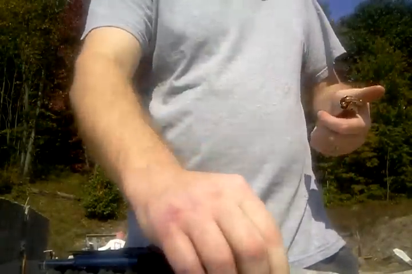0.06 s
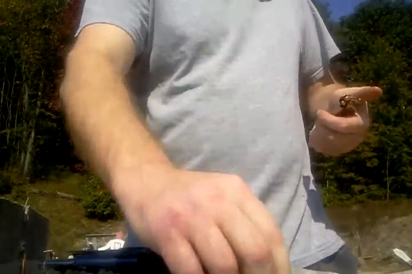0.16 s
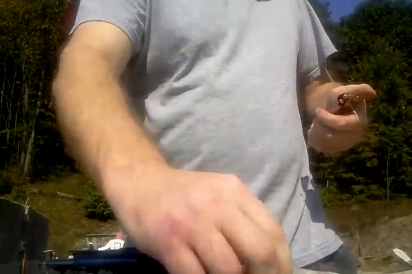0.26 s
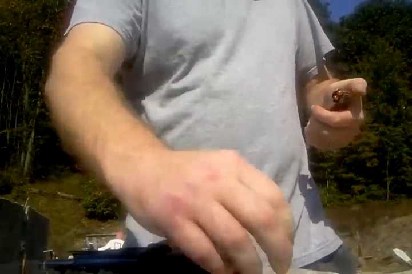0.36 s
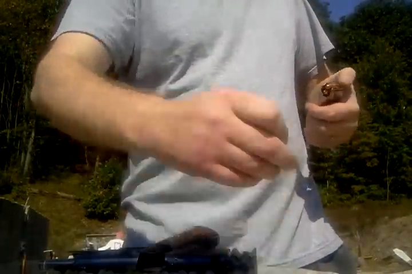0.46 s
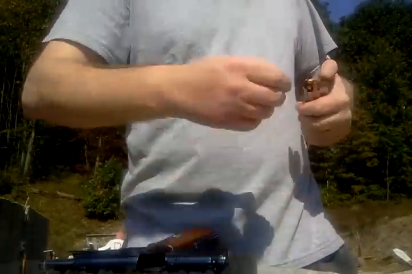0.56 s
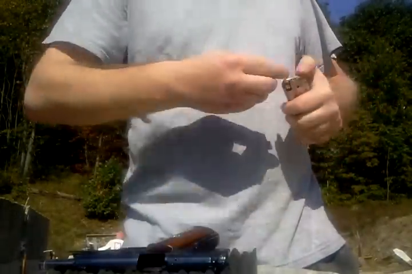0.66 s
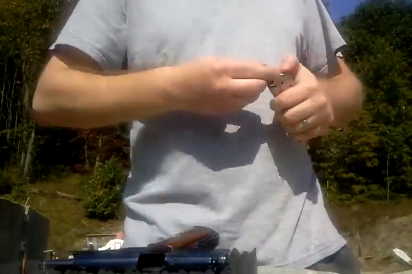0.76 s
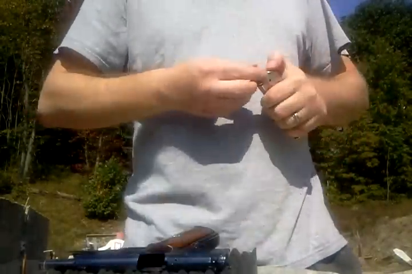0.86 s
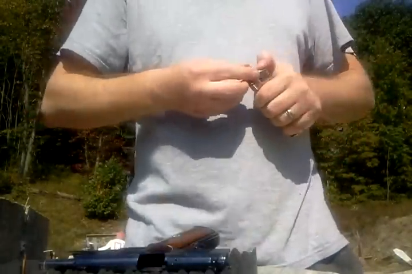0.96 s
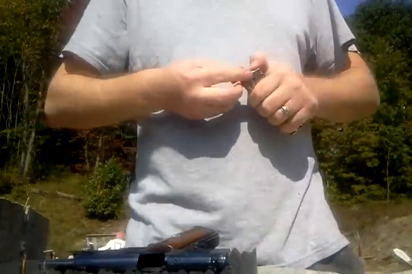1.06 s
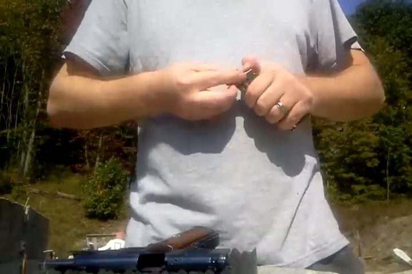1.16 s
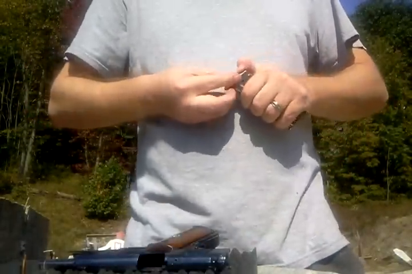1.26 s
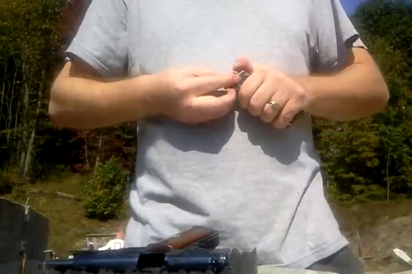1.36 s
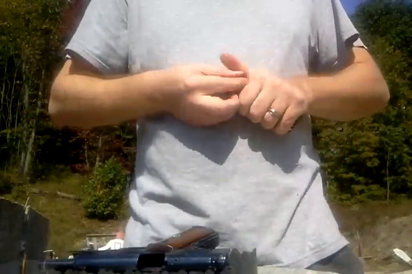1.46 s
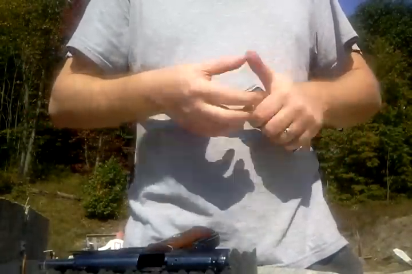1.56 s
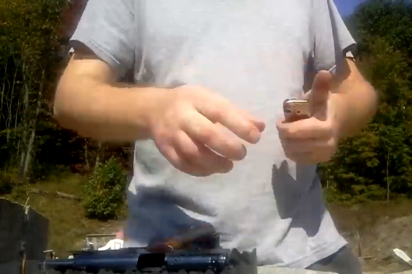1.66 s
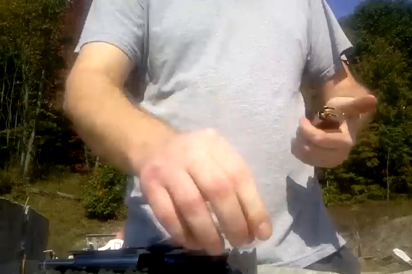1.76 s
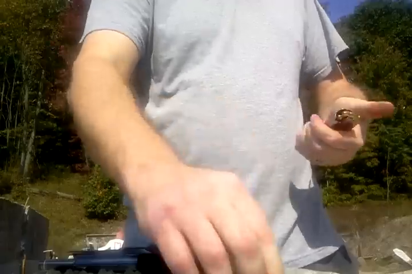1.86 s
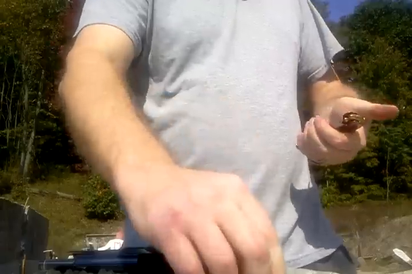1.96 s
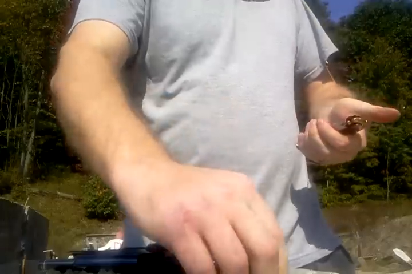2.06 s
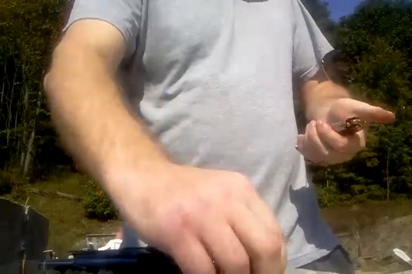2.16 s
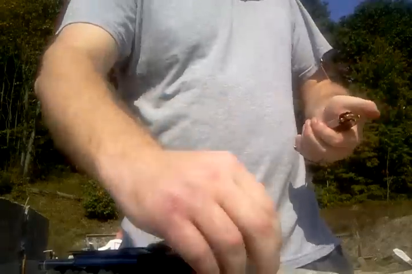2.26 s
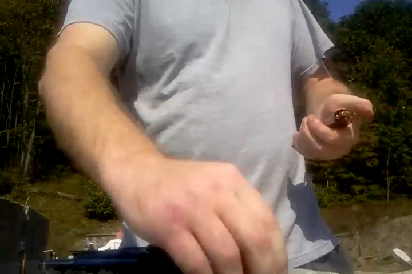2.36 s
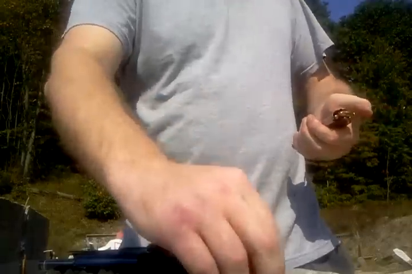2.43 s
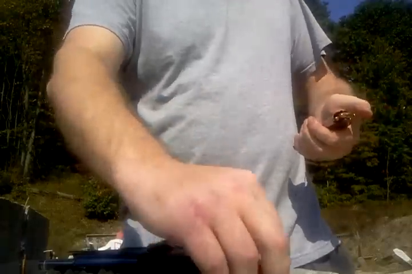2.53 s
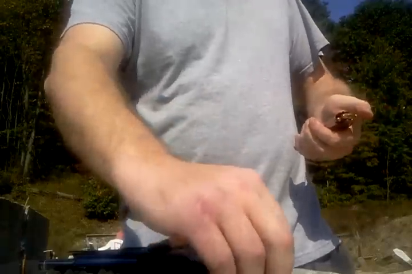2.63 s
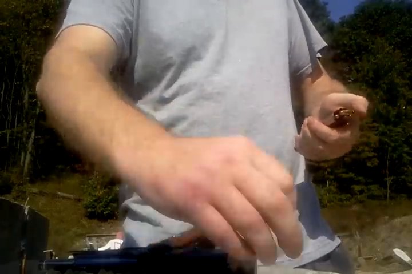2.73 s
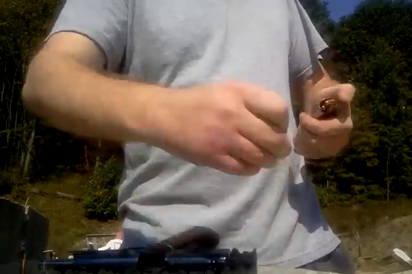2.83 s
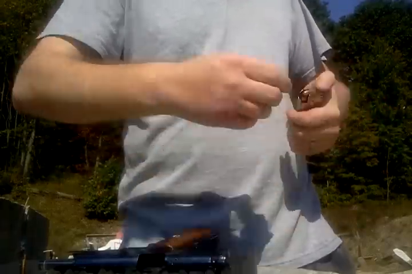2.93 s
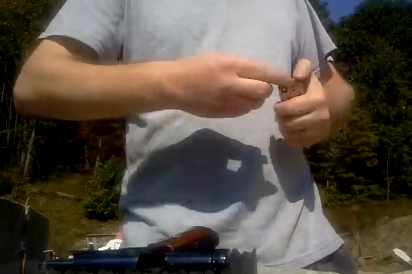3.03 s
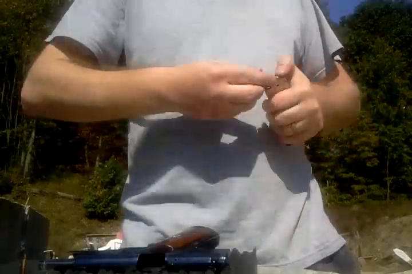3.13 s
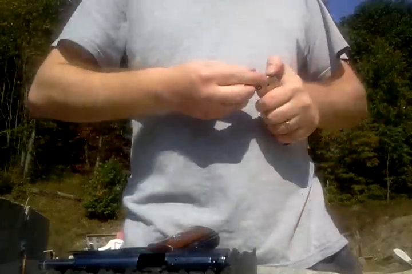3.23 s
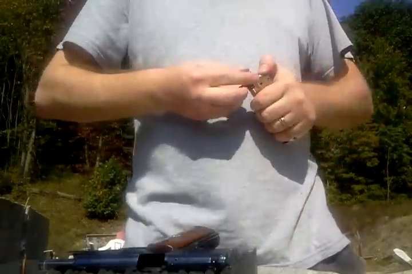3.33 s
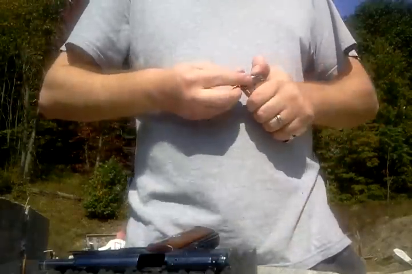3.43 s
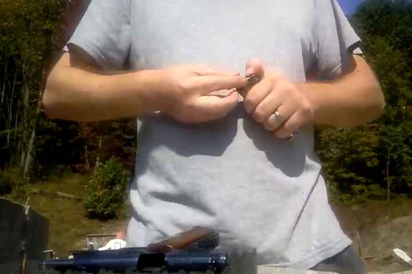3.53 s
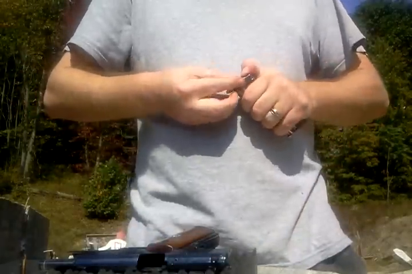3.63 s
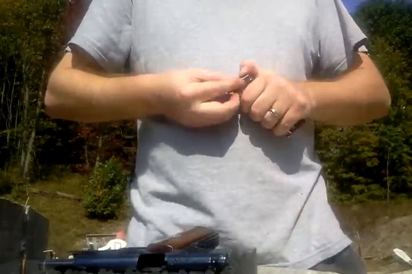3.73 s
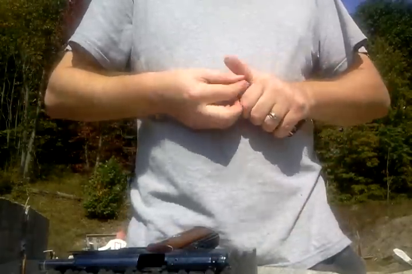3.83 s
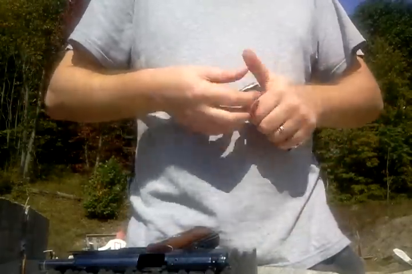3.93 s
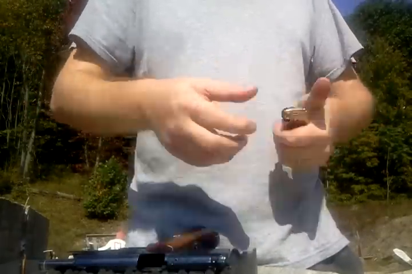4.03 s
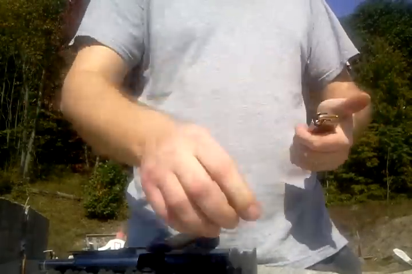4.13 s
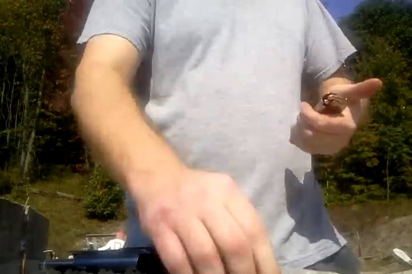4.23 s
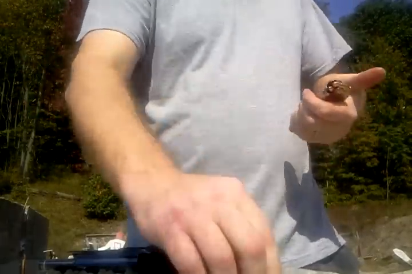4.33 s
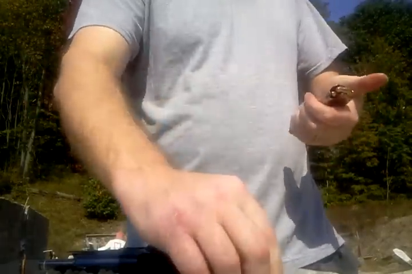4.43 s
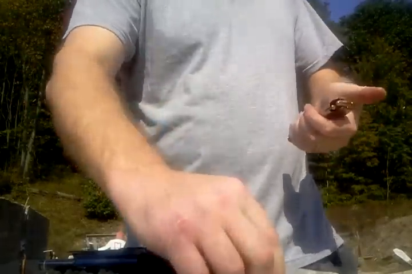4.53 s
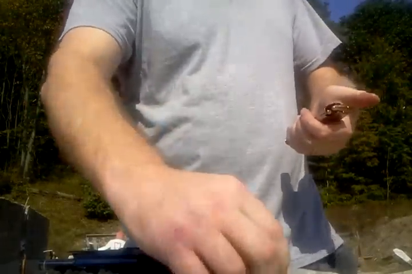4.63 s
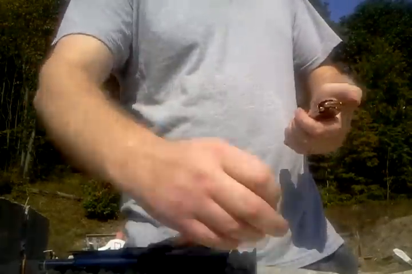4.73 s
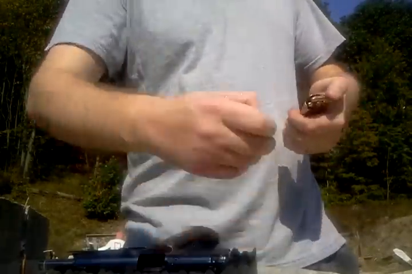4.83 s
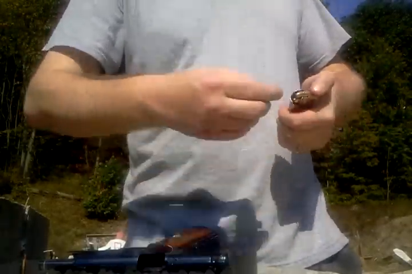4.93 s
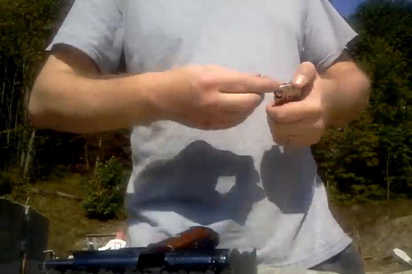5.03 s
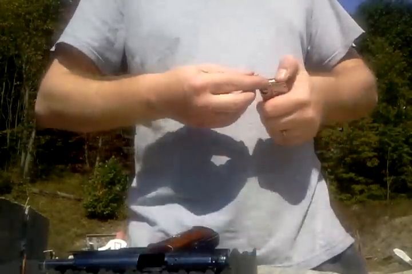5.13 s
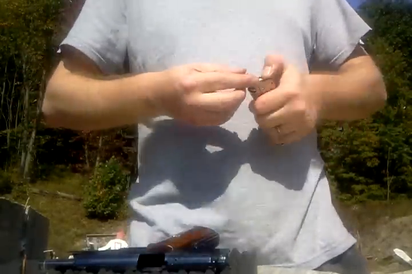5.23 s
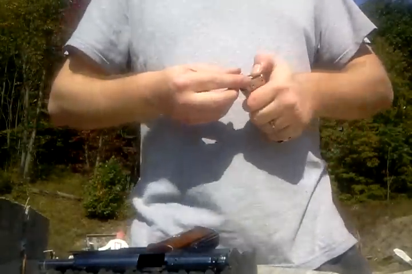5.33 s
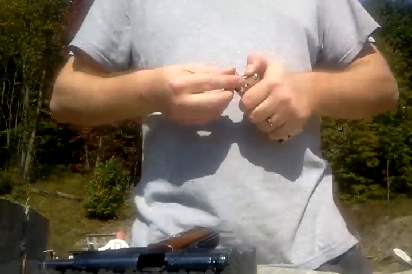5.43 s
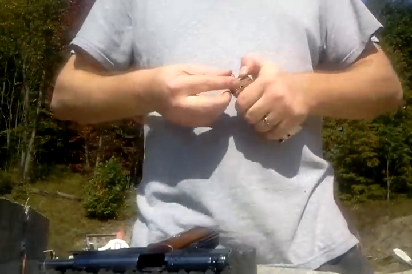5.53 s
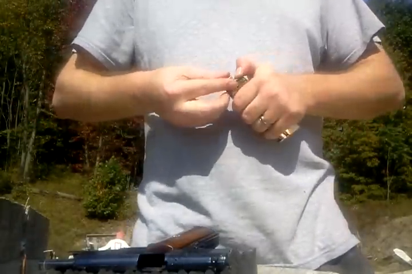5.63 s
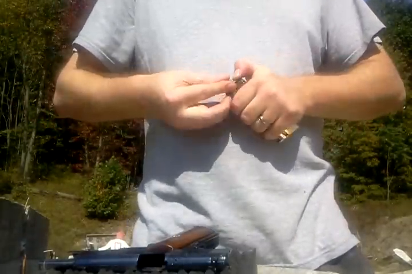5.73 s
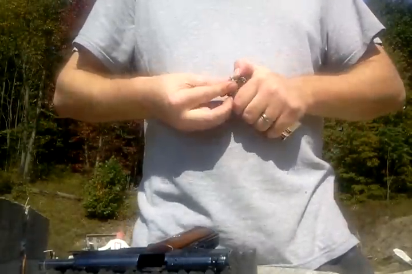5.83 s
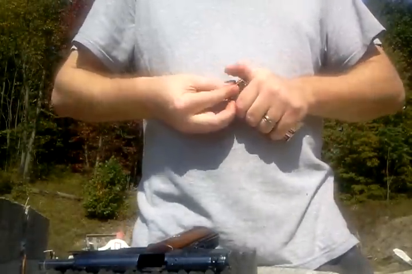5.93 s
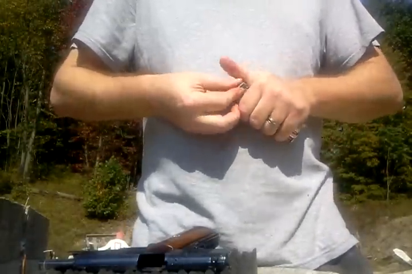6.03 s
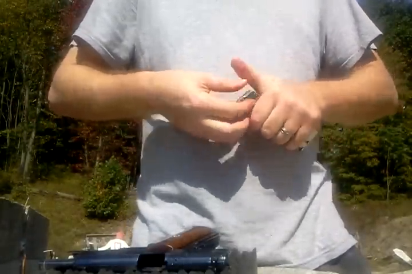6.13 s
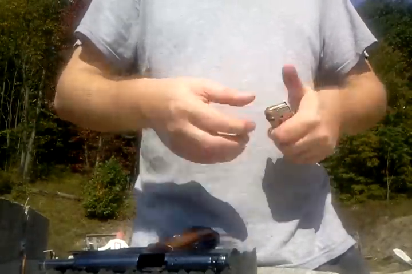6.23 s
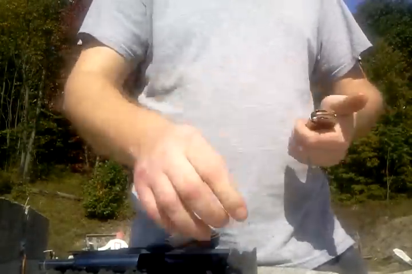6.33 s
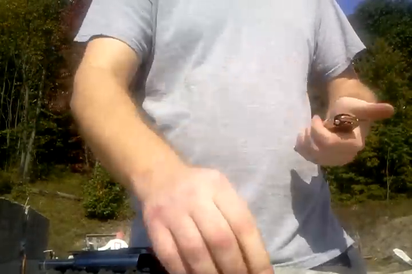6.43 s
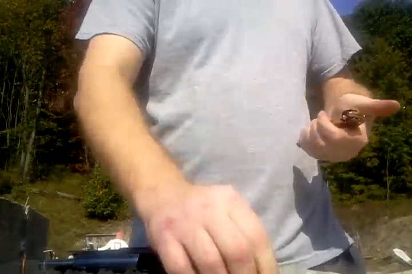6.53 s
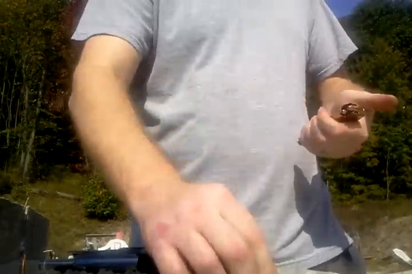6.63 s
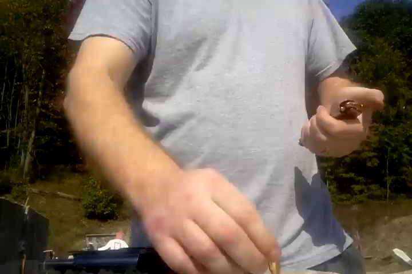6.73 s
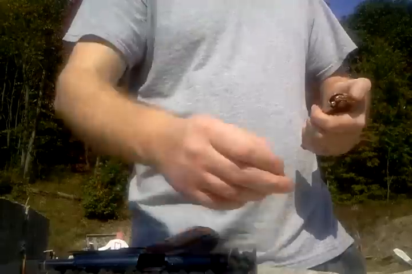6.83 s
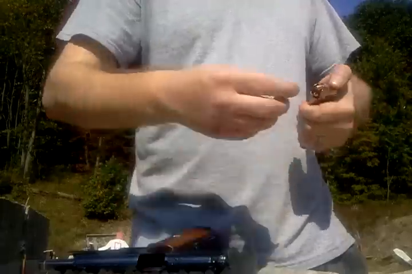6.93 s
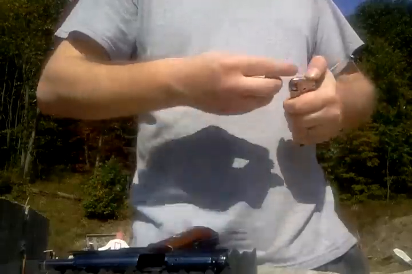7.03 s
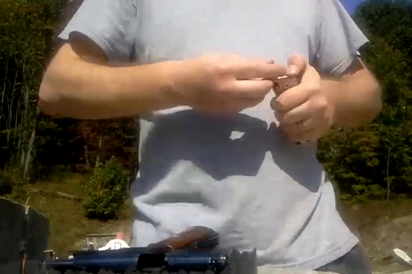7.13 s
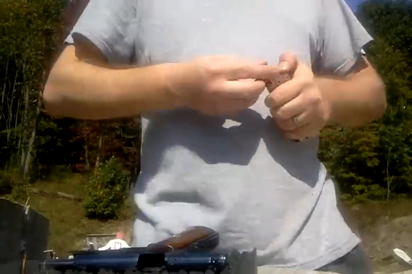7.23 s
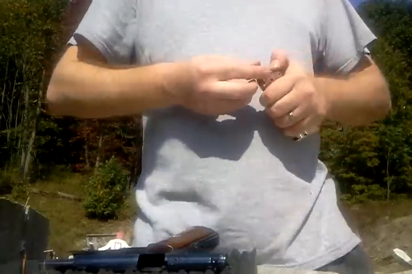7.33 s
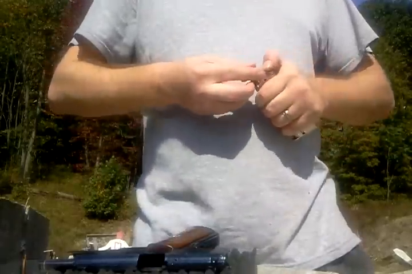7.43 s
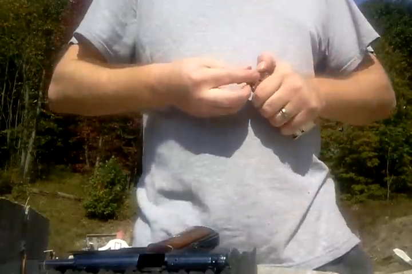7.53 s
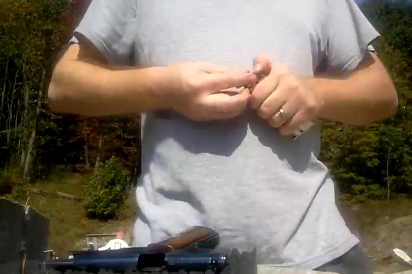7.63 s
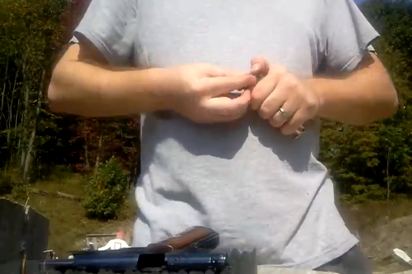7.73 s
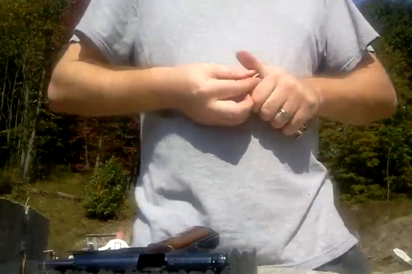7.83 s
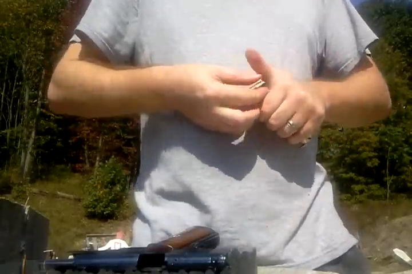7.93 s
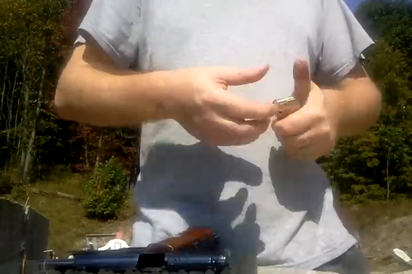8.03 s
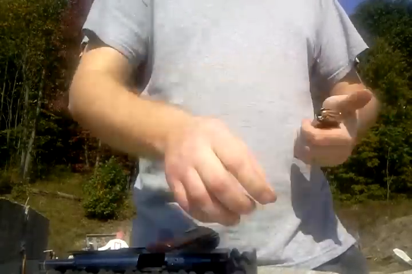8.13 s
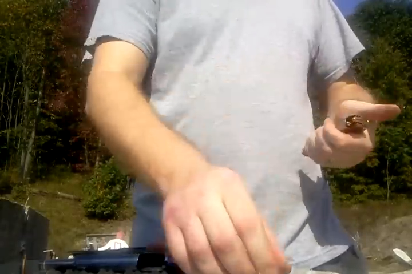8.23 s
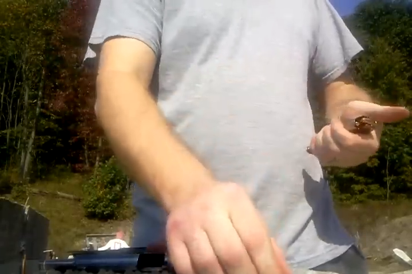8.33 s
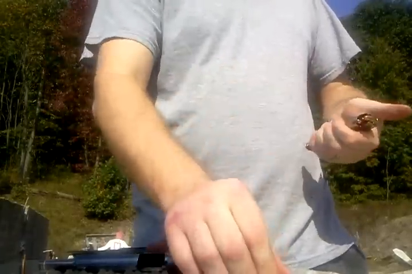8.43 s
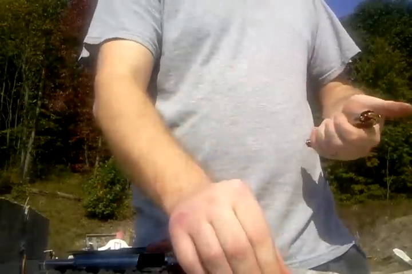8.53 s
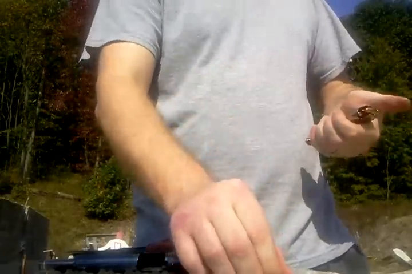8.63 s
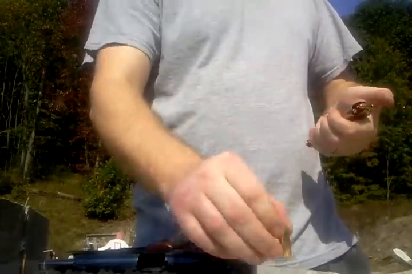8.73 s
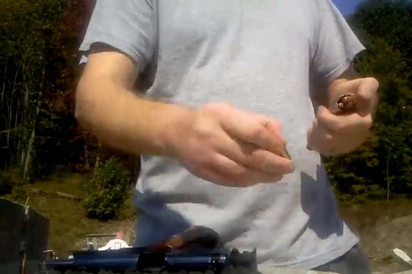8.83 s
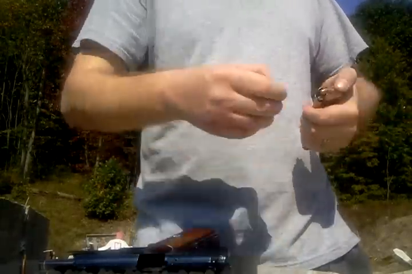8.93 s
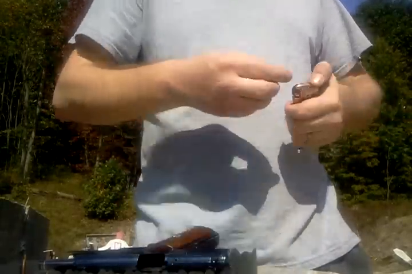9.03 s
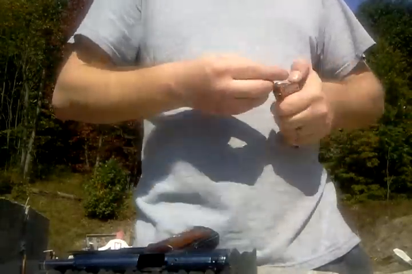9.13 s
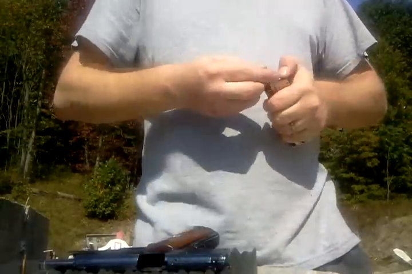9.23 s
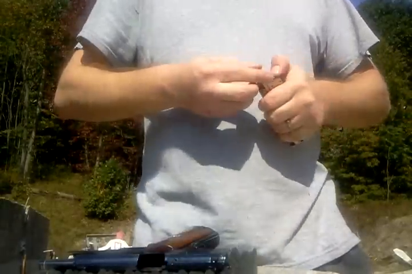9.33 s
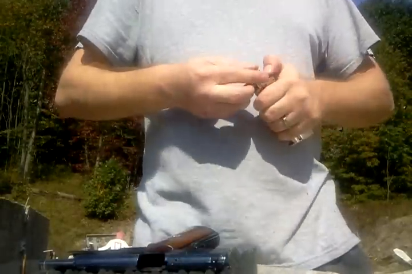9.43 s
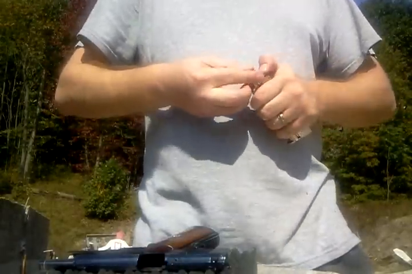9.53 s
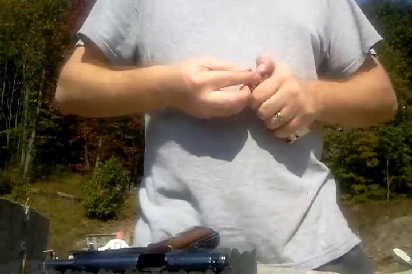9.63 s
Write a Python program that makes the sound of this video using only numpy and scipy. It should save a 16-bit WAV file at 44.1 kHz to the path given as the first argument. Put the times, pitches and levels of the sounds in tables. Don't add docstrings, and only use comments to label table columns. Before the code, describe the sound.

Close to a small microphone outdoors, brass cartridges slide and knock in a plastic tray, then click, scrape and snap sharply into a steel magazine, again and again. A soft breeze hiss and faint low motor hum lie behind. Near six seconds a distant gunshot booms and rolls back from the woods; a second, duller one follows two seconds later.

```python
import sys
import numpy as np
from scipy import signal
from scipy.io import wavfile
from scipy.ndimage import uniform_filter1d

SR = 44100
rng = np.random.default_rng(int(sys.argv[2]) if len(sys.argv) > 2 else 0)


def undo_db(level):
    steps = np.asarray(level, float) / 20
    return 10 ** steps


def to_wav(sig):
    pcm = np.clip(np.atleast_2d(sig), -1, 1) * 32767
    pcm = np.round(pcm).astype(np.int16)
    wavfile.write(sys.argv[1], SR, pcm.T)


N = 426888

# frequency [Hz], density [dB per Hz].
BREEZE_SPECTRUM = [(12, -43.5), (20, -42.5), (97, -13), (119, -7), (290, -8.5), (321, -7), (415, -13),
                   (565, -9.5), (694, -14.5), (1200, -22), (1560, -57.5), (2640, -120)]
# frequency [Hz], density [dB per Hz].
HISS_SPECTRUM = [(500, -16.5), (1100, 2.5), (2000, 1.5), (3000, 0), (5900, 0), (6900, -5), (7500, -13.5),
                 (8000, -27.5), (9000, -37), (11000, -75.5)]
# time [s], level [dB].
BREEZE_LEVEL = [(0, -61.5), (1.4, -61.5), (2.25, -60), (4.2, -61), (4.7, -60), (7.0, -58.5), (9.68, -55.5)]
# time [s], frequency [Hz], level [dB].
MOTOR_HUM = [(0, 135.3, -62.5), (1.0, 131.5, -58.5), (1.071, 130.4, -71), (1.2, 132.3, -57),
             (3.11, 124.4, -61.5), (4.339, 125, -55.5), (5.26, 128.2, -58.5), (7.0, 127.8, -55),
             (8.9, 128.4, -54.5), (9.68, 126.6, -52.5)]
# frequency [Hz], width [Hz], level [dB].
MOTOR_DRONE = [(323.5, 75, -72), (562, 30, -67)]

# start [s], peak [dB].
SHOTS = [
    (5.9484, -5),
    (7.9116, -6),
]
CRACK_SHARE = [
    1.6,
    1,
]
# delay [s], level after first shot [dB], level after second shot [dB].
BOUNCES = [(.0027, -8, -7), (.0075, -12, -11), (.0095, -12, -12), (.019, -9, -9), (.0245, -5, -6),
           (.06, -12, -16), (.0824, -5, -12)]
# delay [s], echo below the shot [dB].
TERRAIN_ECHO = [(0, -45), (.004, -22), (.075, -24), (.16, -20), (.28, -20.5), (.39, -27.5), (.5, -33.5),
                (.72, -45), (1.0, -53.5), (1.75, -58)]
# frequency [Hz], density [dB per Hz].
LOW_ECHO = [(71, -54.5), (120, -23), (242, -13.5), (395, -4), (436, -0.5), (582, 0), (694, 2.5), (1000, 5),
            (1310, 3.8), (1510, 0.5), (2400, -22), (3120, -27), (5280, -120)]
# frequency [Hz], density [dB per Hz].
HIGH_ECHO = [(880, -10.5), (1500, 1.5), (2040, -3), (3090, -2), (3510, -5), (4940, -5), (5410, -7),
             (6090, -5.5), (7290, -16), (8910, -41), (11600, -62.5), (19600, -120)]
# frequency [Hz], density [dB per Hz].
LATE_ECHO = [(120, -35.5), (200, -17.5), (499, -7.5), (566, -3), (740, 0), (1050, 1), (1900, -7.5),
             (3500, -23.5), (5280, -120)]

# start [s], level [dB], frequency [Hz], t60 [s].
THUDS = [(.23, -55, 70, .15), (0.317, -46, 101, 0.078), (.568, -45, 980, 0.026), (2.11, -45, 120, 0.051),
         (2.42, -41, 174, 0.15), (2.438, -43, 248, 0.12), (4.479, -46, 152.4, 0.099),
         (1.629, -36, 606, 0.0099), (2.919, -38, 265, 0.078), (4.013, -24, 550, 0.009),
         (6.93, -31, 507, 0.037), (8.907, -24.5, 530, 0.016)]
# frequency [Hz], level [dB], t60 [s].
TRAY_MODES = [(270, -12, .04), (500, -7, .018), (790, -3, .014), (1310, 0, .013), (1800, -3, .01),
              (2260, 0, .01), (2950, -2, .009), (3550, 0, .01), (4300, -4, .006), (4900, -2, .006),
              (5880, -2, .007), (6900, -6, .006)]
# start [s], peak [dB], strongest ring [Hz], low modes [dB].
KNOCKS = [(.138, -43, 394, -10), (.568, -44.5, 560, 3), (2.139, -38, 2960, -10), (2.224, -37, 1100, -3),
          (2.3985, -39, 1480, 2), (2.417, -47, 3900, -12), (2.434, -43, 3500, 0), (2.585, -46.5, 2500, -6),
          (2.685, -37.5, 894, -13), (2.944, -44, 900, 3), (2.813, -42.5, 1900, 0), (2.9068, -40.5, 950, 9),
          (2.9225, -34, 1250, -8), (2.928, -31.5, 870, -3), (4.468, -28, 3540, 1), (4.478, -29.5, 2940, -6),
          (4.545, -35, 3060, -16.5), (4.59, -45, 450, 0), (4.796, -41.5, 960, -1), (4.88, -44, 805, -2),
          (6.929, -31, 800, 2), (7.281, -41, 587, -14), (8.512, -27.5, 1360, -9), (8.708, -39, 2980, -19),
          (8.906, -37.5, 527, -10)]
# frequency [Hz], width [Hz], level [dB].
POCKET_MODES = [(1800, 278, 13.5), (2500, 990, 10), (3050, 390, 13), (3700, 290, 17.5), (4500, 1300, 1),
                (5900, 460, 17), (6890, 780, -13)]
# start [s], length [s], level [dB], treble [dB].
SLIDES = [(.01, 0.07, -63, -4), (0.176, 0.053, -57, 1), (0.23, 0.11, -60.5, -1), (0.338, 0.077, -59.5, -1),
          (0.44, 0.069, -57, 6), (.497, 0.059, -55, 11.5), (2.094, 0.075, -54.5, -4),
          (2.166, 0.054, -55.5, 3), (2.201, 0.1, -58, -8), (2.294, 0.046, -55, 6), (2.354, 0.059, -59.5, 3),
          (2.708, 0.048, -58.5, -1), (2.77, 0.051, -57.5, -1), (2.822, 0.069, -56.5, 2),
          (4.456, 0.077, -54, -4), (4.528, 0.025, -59, 6), (4.544, 0.089, -55.5, 3),
          (4.675, 0.042, -60.5, -3), (4.746, .052, -57.5, 0), (4.812, .07, -54.5, 6),
          (6.693, 0.055, -55, -2), (6.789, .017, -55.5, 4), (6.806, 0.076, -48.5, -4.5),
          (6.881, 0.038, -51, -10), (6.916, .022, -53, -3), (8.498, 0.093, -51, -5),
          (8.638, 0.053, -51, -12), (8.715, 0.036, -51.5, 5), (8.85, 0.056, -54, -6)]
# start [s], length [s], level
# [dB], treble [dB].
MORE_SLIDES = [(0.98, 0.063, -61.5, 0), (1.375, 0.033, -62, 0), (1.494, 0.021, -61, -9), (1.46, 0.056, -51, -3),
               (1.562, 0.065, -65, 11), (1.656, 0.057, -52.5, -2), (3.368, 0.05, -61, -13),
               (3.805, 0.085, -57.5, 0), (3.976, 0.025, -46, 4), (4.028, 0.067, -60, 3.5),
               (7.735, 0.061, -64, 2)]
# start [s], length [s], level [dB], frequency [Hz].
SQUEAKS = [(.185, .03, -63, 3300), (0.238, 0.027, -61, 3050), (0.278, 0.049, -59, 3050),
           (0.343, .018, -56, 3600), (.345, .012, -58, 5800), (.305, .014, -57, 2600),
           (.204, .009, -54, 3300), (0.387, 0.049, -63, 3220), (2.245, .025, -59, 3750),
           (2.272, 0.076, -60, 3050), (2.173, 0.028, -62, 2870), (6.795, 0.0086, -56, 3650),
           (6.838, 0.041, -52, 3600), (6.84, 0.018, -51, 1850), (6.885, 0.022, -56, 3650),
           (6.888, .022, -51, 1800), (6.917, 0.015, -56, 3600), (7.74, .012, -55, 6100),
           (7.771, .01, -57, 2300), (7.848, .025, -59, 6000), (7.818, 0.022, -57, 2100),
           (7.872, 0.032, -61, 2000), (4.485, .035, -59, 3000), (4.49, .04, -61, 3900),
           (4.565, .035, -60, 3100), (4.683, .03, -63, 3050), (4.755, .03, -61, 3700),
           (4.83, .05, -58, 3700), (4.825, .025, -62, 1400), (8.66, .03, -54, 3650)]

# frequency [Hz], level [dB], t60 [s].
MAGAZINE_MODES = [(1370, -7, .014), (1750, -4, .012), (2480, -1, .013), (3200, 0, .013), (4190, -2, .01),
                  (4670, -1, .008), (5100, 0, .008), (5820, 2, .008), (6380, 2, .008), (6900, 0, .007),
                  (7400, -3, .006)]
# start [s], peak [dB], strongest ring [Hz].
TICKS = [(1.0585, -42, 6450), (1.1902, -41.5, 5200), (1.2697, -44, 2940), (1.3734, -41, 2570),
         (3.4497, -48, 2870), (3.467, -41, 4700), (3.8406, -44, 3200), (3.903, -43.5, 3960),
         (3.9546, -43.5, 2570), (3.9668, -50, 5710), (5.258, -46, 1710), (5.4435, -49, 4100),
         (6.222, -23, 6160), (7.2165, -49, 6160), (7.327, -46, 6160), (7.3724, -43.5, 2676),
         (7.702, -46, 6140), (7.856, -49, 1910), (9.3955, -39.5, 6400), (9.5562, -42.5, 4500)]
# start [s], peak [dB], strongest ring [Hz], low modes [dB].
CLICKS = [(0.9858, -34, 2870, -14), (1.012, -33.5, 5600, -14), (1.0738, -37.5, 6200, -14),
          (1.1133, -40, 5050, -12), (1.286, -39.5, 3050, -2.5), (1.397, -35, 5560, -5),
          (1.4078, -37, 5760, -15), (1.595, -49, 6200, -12), (1.468, -35, 5700, -1),
          (1.478, -31, 5200, -16), (1.5727, -39, 2070, -8), (1.6107, -27, 5800, -19),
          (1.655, -35, 5810, -9), (1.678, -32, 2530, -4), (3.42, -34.5, 5100, -15), (3.7527, -30, 5180, -5),
          (3.811, -36, 4930, -9), (3.8173, -29.5, 1553, -7.5), (3.983, -27, 4300, -7),
          (3.9916, -31.5, 6300, -21), (4.021, -26.5, 4200, -7), (4.075, -38, 2500, -18),
          (4.082, -29.5, 6080, -9), (4.1, -35, 6000, -6), (5.548, -31, 5540, -15),
          (5.5826, -34.5, 5670, -8), (5.9258, -33, 6200, -13), (5.9413, -31, 5900, -10),
          (7.7358, -36, 5100, -9), (7.767, -46, 6120, -9)]
# start [s], peak [dB], strongest ring [Hz], low modes [dB], chatter length [ms].
SNAPS = [(1.392, -30, 3020, -12, 1.5), (1.4895, -40, 2400, 0, .5), (1.6415, -44, 4300, -7, 1),
         (1.686, -35.5, 6200, -18, .8), (1.626, -24, 5100, -20, 1.2), (1.6645, -33, 2900, 0, 1.2),
         (1.6904, -29.5, 2220, -12, 1.57), (3.279, -43, 4100, -17, 2), (3.3682, -29, 4530, -15, 2.6),
         (3.7307, -26.5, 5900, -8.5, 1.6), (3.802, -38, 4980, -5, 2), (3.985, -27, 5520, -24, 2.2),
         (4.008, -26, 4080, -8, 1), (1.517, -46, 1900, 0, 1), (4.0195, -23.5, 2500, -3, 1),
         (4.026, -35, 5000, -9, 1.2), (3.866, -43, 2200, 0, 2), (5.503, -45, 4060, -18, 2),
         (4.042, -43, 3200, 0, 1), (5.8882, -26, 4700, -12, .4), (5.8978, -24.5, 4600, -9, .9),
         (6.317, -18, 6870, -18, 2.1), (3.76, -41, 3200, -4, 2), (7.5795, -46, 6400, -20, 0.89)]
# (frequency [Hz], level
# [dB], t60 [ms]).
STACK_SEATS = [
    ([(1.4972, -21), (1.5003, -26)], [(2370, -2.5, 13), (3190, -3, 13), (4240, -10, 8), (5130, -4, 11), (5750, 1, 9.1), (6870, -12, 9.7)]),
    ([(1.6186, -23.5), (1.6207, -31)], [(1920, -4, 12), (3190, -3, 13), (4930, -0.5, 10), (5780, -2, 11), (7070, -9, 8)]),
    ([(1.6299, -9.5), (1.6313, -20), (1.6326, -23)], [(1370, -14.5, 12.5), (1965, -15, 13), (3101, -3.5, 12), (4300, -8, 10), (5070, 0.5, 10), (5790, -1, 11), (6930, 1, 8.7)]),
    ([(3.2642, -22), (3.2674, -24), (3.2697, -22.5), (3.2722, -29)], [(1980, -15, 12), (2570, -10, 11), (3800, -14.5, 10), (4260, -1.5, 16), (5380, -1.5, 11), (5700, -2, 11), (6400, -8, 9)]),
    ([(3.7918, -7.5)], [(1710, -11, 15), (2430, -10.5, 14), (3220, -4.5, 14.6), (4000, -8, 11), (4980, 1, 11), (5900, 1, 12), (6950, -9.5, 13)]),
               ([(4.0021, -20), (4.0031, -16), (4.0058, -19)], [(1390, -5, 11), (2530, -7.5, 14), (3200, -4, 12), (4120, -2, 13), (4600, -6, 12), (5970, -2, 9), (6840, 2, 8)]),
    ([(4.0128, -17), (4.0144, -8), (4.0153, -6.5)], [(1480, -12, 9), (2400, -9, 12), (3250, -8, 19), (4300, -3.5, 9.8), (4630, -2.5, 10), (5140, -6, 12), (5770, 1, 10), (6330, 2, 10), (7040, -8, 10)]),
    ([(5.4912, -16.5), (5.4935, -26)], [(2520, -14, 16), (3160, -18, 15), (4110, 2, 24), (4360, -1, 16), (5600, 0, 11), (5860, -5, 14), (6430, -1, 13), (6840, -5, 13)]),
    ([(7.586, -19.5)], [(1400, -21, 12), (2610, -20, 13), (3760, -13, 9), (5200, -3, 8.6), (6400, 1.5, 9.3), (6840, -8, 11)]),
]
# (frequency [Hz], level [dB], t60 [ms]).
CASE_DROPS = [
    ([(2.9183, -32), (2.9192, -17)], [(790, -5, 14), (1310, 2, 13), (1700, -1, 10), (2260, -3, 10), (2900, -8, 9), (3520, -2, 10), (4900, -10, 8), (5880, -8, 7)]),
]
# (frequency [Hz], level [dB], t60 [ms]).
NUDGES = [
    ([(7.7672, -37), (7.7722, -43), (7.7765, -41), (7.7805, -44), (7.7855, -43)], [(1500, -5, 10), (4600, -8, 8), (5900, -1, 12), (6300, -1, 10)]),
    ([(2.4095, -41), (2.4145, -38), (2.417, -43)], [(480, -6, 20), (1000, -3, 9), (1450, -1, 10), (1950, -5, 8)]),
]
# start [s], peak [dB].
TAPS = [
    (1.4354, -28),
    (5.2533, -25),
    (5.801, -30),
    (7.2624, -24.5),
]
# frequency [Hz], width [Hz], level [dB].
TAP_RINGS = [
    [(1390, 240, -19), (1970, 270, -17), (3060, 510, -16), (4350, 250, -14), (5620, 270, 0)],
    [(1710, 240, -4), (2490, 270, -7), (3980, 390, -9), (4670, 190, -10), (6380, 430, 0)],
    [(1480, 290, 0), (3250, 280, 0), (5230, 270, -3), (5700, 180, -2), (6510, 260, 0)],
    [(3980, 330, -8), (5010, 180, 0), (5420, 220, 0), (6230, 270, -1), (7110, 280, -18)],
]

HISS_DB, HISS_FOLLOWS = -60.5, 0.5
BANK_CRACK, FLIP_S = 2.5, .07
GROUND_DULL_DB, TREE_LINE_S, TREE_BRIGHT_DB = -5, .11, 2
AIR_LOSS_DB_PER_S, MOST_LOSS_DB = 20, -7.5
PATCH_DB = 1.2
POCKET_DRIFT = .035
SQUEAK_WIDTH_HZ, GRIT_DB = 330, -12
CLICK_MS, TICK_MS, KNOCK_MS = .9, 1.1, 1.0
TICK_LOW_DB = -11
FIRST_CONTACT = 1.1
SHELL_HZ, SHELL_RISE_MS, LIP_RISE_MS = 3600, 0.73, 0.15
RATTLE, RATTLE_MS = .1, 1.5


def evened(x):
    return x / np.sqrt(np.mean(x ** 2) + 1e-20)


def smooth_noise(width):
    return evened(uniform_filter1d(uniform_filter1d(rng.standard_normal(N), width), width))


def add(mix, s, sound):
    part = mix[max(round(s * SR), 0):][:len(sound)]
    part += sound[:len(part)]


def band(x, lo_hz, hi_hz):
    return signal.sosfilt(signal.butter(3, [lo_hz, hi_hz], "band", fs=SR, output="sos"), x)


def coloured(x, spectrum):
    f, db = np.transpose(spectrum)
    hz = abs(np.fft.fftfreq(4096, 1 / SR))
    log_gain = np.log(undo_db(np.interp(np.log(hz + 1), np.log(f + 1), db)))
    taps = np.fft.ifft(np.exp(np.conj(signal.hilbert(log_gain)))).real
    return evened(signal.oaconvolve(x, taps)[:len(x)])


def resonate(x, hz, width_hz):
    turn = np.exp(2j * np.pi * np.cumsum(hz * np.ones(len(x))) / SR)
    r = np.exp(-np.pi * width_hz / SR)
    return 2 * (turn * signal.lfilter([1 - r], [1, -r], x / turn)).real


def echo_db():
    t = np.arange(N) / SR
    s, shot_db = np.transpose(SHOTS)
    latest = np.maximum(np.searchsorted(s, t) - 1, 0)
    delay = t - s[latest]
    low_db = shot_db[latest] + np.interp(delay, *np.transpose(TERRAIN_ECHO), left=-120)
    faded_db = np.maximum(TREE_BRIGHT_DB - AIR_LOSS_DB_PER_S * (delay - TREE_LINE_S), MOST_LOSS_DB)
    reached = np.clip(delay / TREE_LINE_S, 0, 1) ** 3
    return low_db, GROUND_DULL_DB + (faded_db - GROUND_DULL_DB) * reached


def breeze():
    level_db = np.interp(np.arange(N) / SR, *np.transpose(BREEZE_LEVEL))
    hiss_db = HISS_DB + HISS_FOLLOWS * (level_db - level_db.mean())
    low = coloured(rng.standard_normal(N), BREEZE_SPECTRUM)
    hiss = coloured(rng.standard_normal(N), HISS_SPECTRUM)
    gusts_db = .9 * smooth_noise(2000)
    return undo_db(gusts_db) * (undo_db(level_db + 1.5) * low + undo_db(hiss_db) * hiss)


def motor():
    s, hz, db = np.transpose(MOTOR_HUM)
    t = np.arange(N) / SR
    pitch_hz = np.interp(t, s, hz)
    tone = np.sin(2 * np.pi * np.cumsum(pitch_hz) / SR)
    fuzz = evened(resonate(rng.standard_normal(N), pitch_hz, 10.0))
    out = undo_db(np.interp(t, s, db)) * (0.75 * tone + 0.26 * fuzz)
    for hz, width_hz, db in MOTOR_DRONE:
        out += undo_db(db) * evened(resonate(rng.standard_normal(N), hz, width_hz))
    return out


def background():
    duck_db = 0.2 * np.maximum(uniform_filter1d(echo_db()[0], 3000) + 31.0, 0)
    return (breeze() + motor()) / undo_db(duck_db)


def blast(crack):
    u = np.arange(1500) / SR / 0.00087
    push = (1 - u) * np.exp(-u)
    swing = 0.082 * push + 1.54 * resonate(push, 720, 390)
    wave = swing + crack * resonate(push, 3650, 1200) if crack is None else blast_sum(push, crack)
    return wave / abs(wave).max()


def blast_sum(push, crack):
    return 0.082 * push + 1.54 * resonate(push, 720, 390) + crack * resonate(push, 3650, 1200)


def direct_shots():
    out = np.zeros(N)
    dull = band(blast(0), 159, 1000)
    for k, (s, db) in enumerate(SHOTS):
        wave, sharp = (band(band(blast(c * CRACK_SHARE[k]), 143, 5200), 60, 6500) for c in (1, BANK_CRACK))
        add(out, s, undo_db(db + 2) * wave)
        for delay, *bounce_db in BOUNCES:
            copy = np.sign(FLIP_S - delay) * sharp if delay > .015 else 0.98 * dull
            add(out, s + delay, undo_db(db + bounce_db[k]) * copy)
    return out


def patchy(x):
    z = signal.stft(x, nperseg=512)[2]
    noise = rng.standard_normal(z.T.shape)
    patches = evened(uniform_filter1d(uniform_filter1d(noise, size=7, axis=0), size=5, axis=1))
    return signal.istft(z * undo_db(PATCH_DB * patches.T - PATCH_DB ** 2 / 8.7), nperseg=512)[1][:len(x)]


def woods_echo():
    trunk_db = 2.2 * np.minimum(rng.exponential(1, N), 3.5)
    trunks = rng.standard_normal(N) * undo_db(trunk_db) * (rng.random(N) < 10000 / SR)
    low_db, treble_db = echo_db()
    late = np.clip((-30 - uniform_filter1d(low_db, 2000)) / 12, 0, 1)
    low = np.sqrt(1 - late) * coloured(trunks, LOW_ECHO) + np.sqrt(late) * coloured(trunks[::-1], LATE_ECHO)
    echo = undo_db(low_db) * patchy(low + undo_db(treble_db) * coloured(trunks, HIGH_ECHO))
    return signal.sosfilt(signal.butter(4, 150, "high", fs=SR, output="sos"), echo)


def thuds():
    out, t = np.zeros(N), np.arange(SR // 4) / SR
    for s, db, hz, t60 in THUDS:
        add(out, s, undo_db(db - 60 * t / t60) * np.sin(2 * np.pi * hz * t) * (1 - np.exp(-t / 0.0016)))
    return out


def slides(slips):
    out, rows = np.zeros(N), SLIDES + MORE_SLIDES
    chance = rng.standard_normal((len(rows), len(POCKET_MODES), 2))
    gripped = slips * undo_db(2.6 * smooth_noise(120))
    for (s, length, db, treble_db), row in zip(rows, chance):
        at, n = round(s * SR), round(length * SR)
        stroke = np.pad(gripped[at:at + n] * signal.windows.tukey(n, .55), (0, 300))
        glide = POCKET_DRIFT * np.linspace(.4, 1.6, len(stroke))
        rung = np.zeros(len(stroke))
        for (hz, width_hz, mode_db), (a, b) in zip(POCKET_MODES, row):
            gain_db = mode_db + 2.8 * a + treble_db * (hz > 4000)
            rung += undo_db(gain_db) * resonate(stroke, hz * (1 + b * glide), width_hz)
        add(out, s, undo_db(db) * evened(band(band(rung, 1200, 7000), 900, 7000)))
    return out


def squeaks(slips):
    out = np.zeros(N)
    for s, length, db, hz in SQUEAKS:
        at, n = round(s * SR), round(length * SR)
        stroke = np.pad(slips[at:at + n] * np.hanning(n) ** .5, (0, 300))
        squeak = evened(resonate(resonate(stroke, hz, SQUEAK_WIDTH_HZ), hz, 3 * SQUEAK_WIDTH_HZ))
        grit = evened(band(band(stroke, 1500, 6800), 1500, 6800))
        add(out, s, undo_db(db) * (squeak + undo_db(GRIT_DB) * grit))
    return out


def friction():
    slips = rng.standard_normal(N) * undo_db(2.1 * rng.exponential(1, N))
    return slides(slips) + squeaks(slips)


def hits(rows, modes, split_hz, spread_db, lift_db, lo_hz, ring_share):
    out, t = np.zeros(N), np.arange(1500) / SR
    f, mode_db, t60 = np.transpose(modes)
    chance = rng.standard_normal((len(rows), 2, len(f)))
    chatter = rng.standard_normal((len(rows), 800))
    for (s, db, hz, low_db, ms), (a, b), noise in zip(rows, chance, chatter):
        tuned = f * (1 + 0.024 * b)
        tuned[np.argmin(abs(f - hz))] = hz
        near_db = lift_db * np.exp(-(np.log(tuned / hz) / 0.13) ** 2)
        share_db = mode_db + spread_db * a + (low_db + 7.0) * (f < split_hz) + near_db
        decay = undo_db(share_db[:, None] - 60 * t / (ring_share * t60[:, None]))
        ring = (decay * np.sin(2 * np.pi * tuned[:, None] * t)).sum(0)
        ring *= (1 - np.exp(-t / .00028)) ** 2
        u = t[:800] * 1000 / ms
        contacts = noise * abs(noise) * np.sqrt(u) * np.exp(-u)
        contacts[round(SR / 2000)] += FIRST_CONTACT * np.linalg.norm(contacts)
        sound = band(signal.fftconvolve(ring, contacts), lo_hz, 6500)
        add(out, s, undo_db(db) * sound / abs(sound).max())
    return out


def tray_knocks():
    return hits([(*row, KNOCK_MS) for row in KNOCKS], TRAY_MODES, 2000, 2.0, 7.9, 420, 0.62)


def brass_ticks():
    return hits([(*row, TICK_LOW_DB, TICK_MS) for row in TICKS], MAGAZINE_MODES, 3600, 1.4, 14.7, 890, 1.5)


def lip_clicks():
    rows = SNAPS + [(*row, CLICK_MS) for row in CLICKS]
    return hits(rows, MAGAZINE_MODES, 3600, 2.8, 7.7, 670, 1.0)


def seats():
    out, ms = np.zeros(N), np.arange(1500) * 1000 / SR
    taps = []
    for tap, rings in zip(TAPS, TAP_RINGS):
        taps.append(([tap], [(hz, db, 2300 / width_hz) for hz, width_hz, db in rings]))
    for contacts, modes in STACK_SEATS + CASE_DROPS + taps + NUDGES:
        hz, db, t60_ms = np.transpose(modes)[..., None]
        rise = 1 - np.exp(-ms / np.where(hz < SHELL_HZ, SHELL_RISE_MS, LIP_RISE_MS))
        ring = (rise * undo_db(db - 68 * ms / t60_ms) * np.sin(2 * np.pi * hz * ms / 1000)).sum(0)
        for s, peak_db in contacts:
            touch = (ms == 0) + RATTLE * rng.standard_normal(len(ms)) * np.exp(-ms / RATTLE_MS)
            sound = band(band(signal.fftconvolve(ring, touch), 700, 7900), 300, 7700)
            add(out, s, undo_db(peak_db) * sound / abs(ring).max())
    return out


def scene():
    far = background() + direct_shots() + woods_echo()
    tray = thuds() + friction() + tray_knocks()
    magazine = brass_ticks() + lip_clicks() + seats()
    return (far + tray + magazine)[None]


def top_cut(x):
    return signal.sosfilt(signal.butter(12, 9060, fs=SR, output="sos"), x)


def record(dry):
    rolloff = signal.butter(16, 8800, fs=SR, output="sos")
    notch = np.hstack(signal.iirnotch(8000, 30.0, fs=SR))
    return top_cut(signal.sosfilt(np.vstack([rolloff, notch]), dry))


dry = scene()
out = record(dry)
to_wav(out)
```